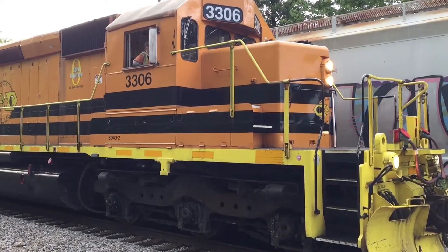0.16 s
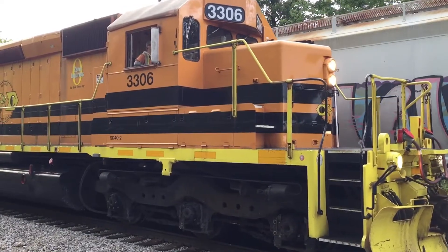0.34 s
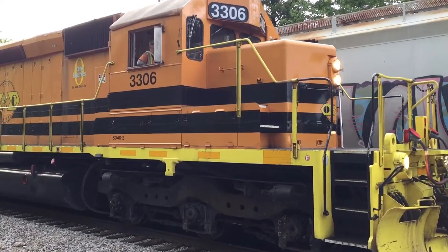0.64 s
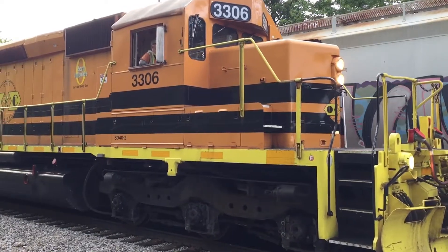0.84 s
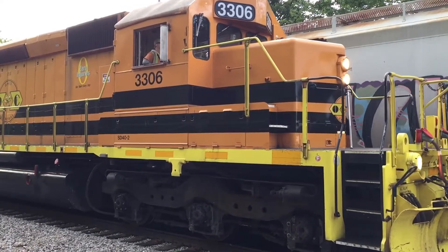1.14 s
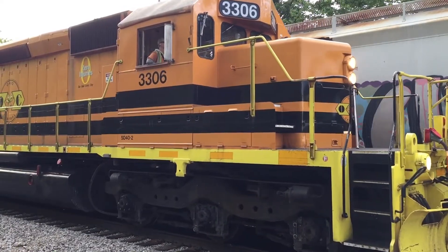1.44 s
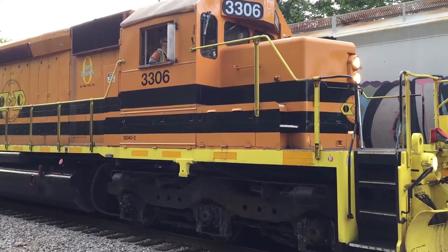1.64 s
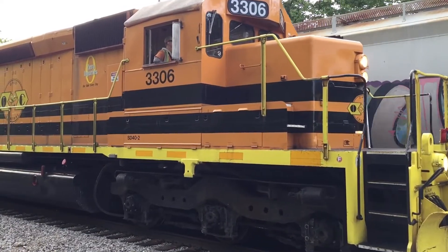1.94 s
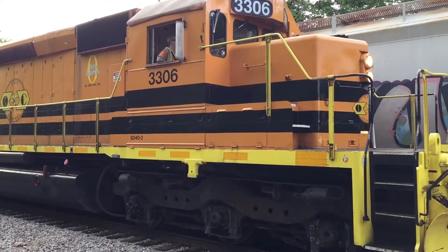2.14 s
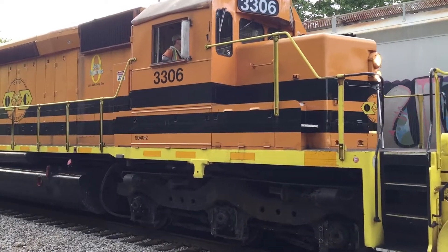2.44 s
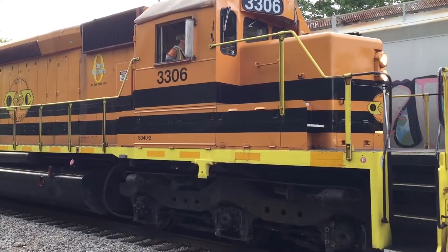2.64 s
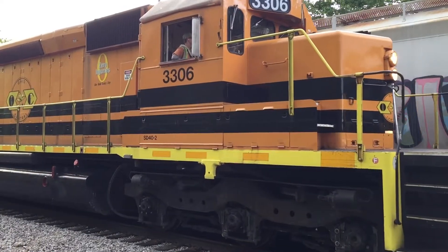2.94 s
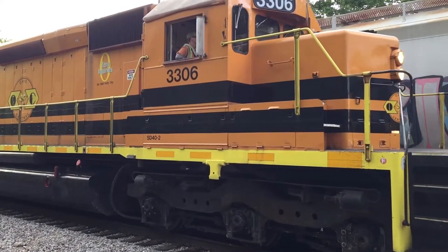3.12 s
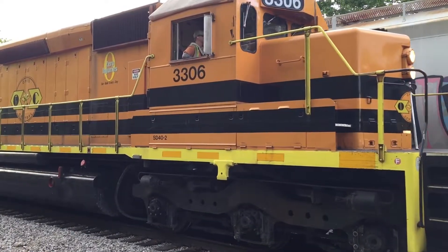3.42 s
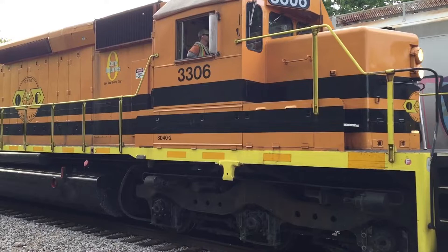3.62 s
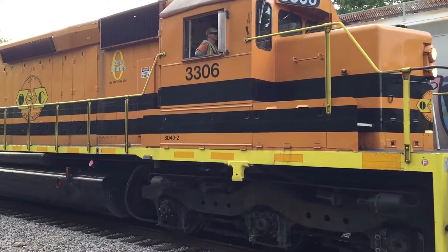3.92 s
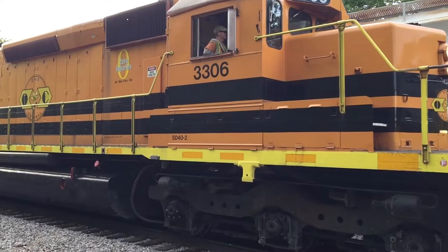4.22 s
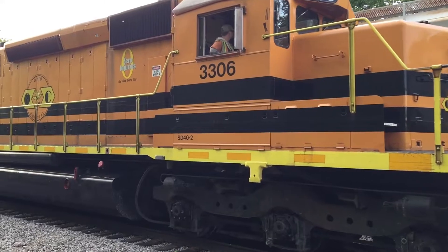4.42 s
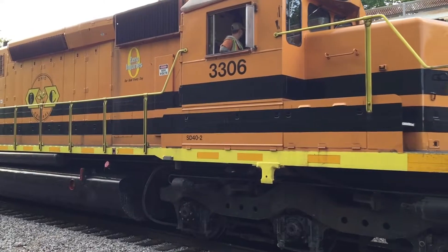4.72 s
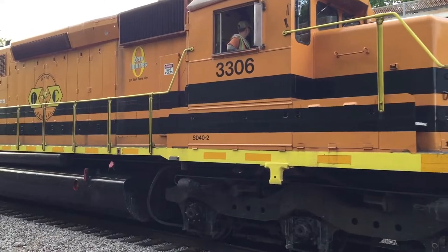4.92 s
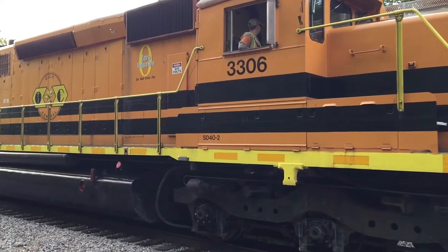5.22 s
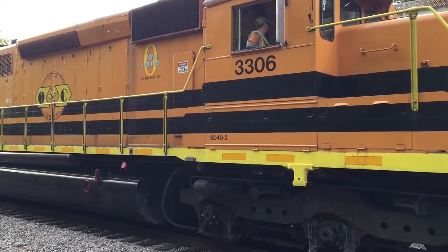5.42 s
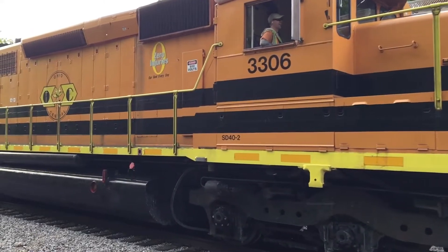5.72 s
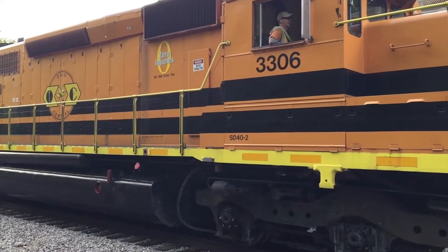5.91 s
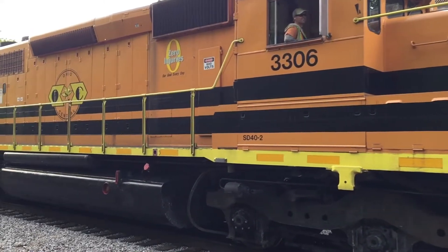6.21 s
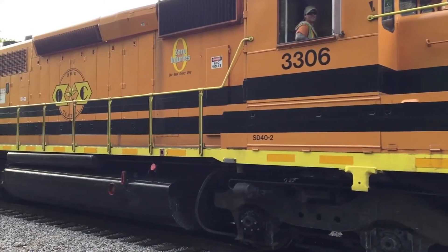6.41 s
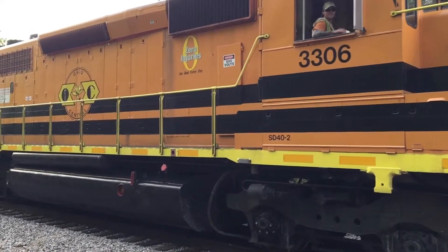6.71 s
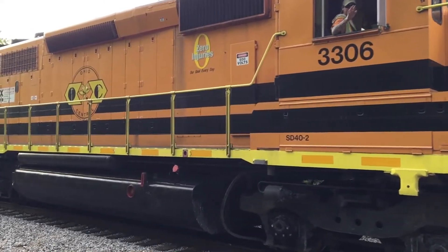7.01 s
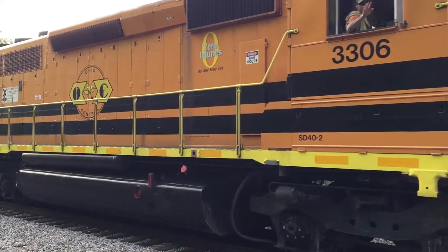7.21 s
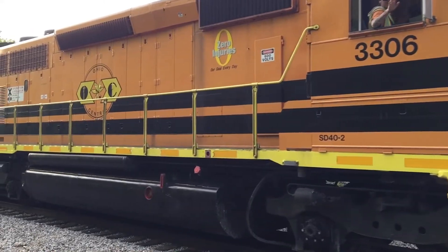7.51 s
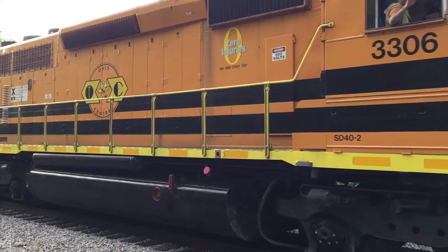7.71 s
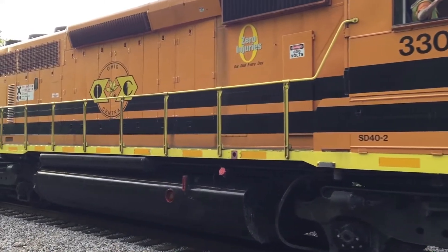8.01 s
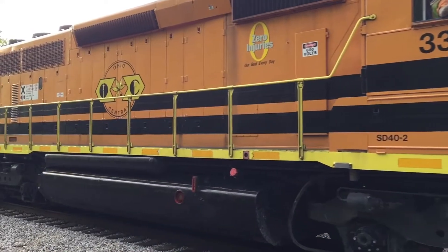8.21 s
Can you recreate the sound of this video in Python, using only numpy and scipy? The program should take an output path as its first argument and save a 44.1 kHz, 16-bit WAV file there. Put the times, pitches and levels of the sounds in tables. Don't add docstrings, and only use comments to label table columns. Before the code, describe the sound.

Close beside the track, several coupled diesel locomotives creep past. A heavy low exhaust throb rises in pitch over the first two seconds, then settles into a steady beating drone. Wavering gear whine and a faint high turbo whistle ride above casing and fan roar. Short air spits tick out every second or so, the later ones mostly sharper. One outdoor microphone by the gravel; no horn.

```python
import sys
import numpy as np
from scipy import signal
from scipy.io import wavfile

SR = 44100
rng = np.random.default_rng(int(sys.argv[2]) if len(sys.argv) > 2 else 0)


def persist_wave(psi):
    counts = np.round(np.clip(psi, -1, 1) * 32767).astype(np.int16)
    wavfile.write(sys.argv[1], SR, np.atleast_2d(counts).T)


def voltage_ratio(decibels):
    exponent = np.asarray(decibels, float) / 20
    return 10 ** exponent


N = 368229


def in_time(rows):
    s, *columns = np.transpose(rows)
    return [np.interp(np.arange(N) / SR, s, c) for c in columns]


def rms_one(x):
    return x / np.sqrt(np.mean(x ** 2) + 1e-20)


def drift(rate):
    pole = np.exp(-80 * np.pi * rate / SR)
    noise = rng.standard_normal(N // 40 + 2002)
    slow = signal.lfilter([1], [1, -2 * pole, pole * pole], noise)[2000:]
    return np.interp(np.arange(N) / 40, np.arange(len(slow)), rms_one(slow))


def band(x, low_hz, high_hz):
    return signal.sosfilt(signal.butter(2, [low_hz, high_hz], "band", fs=SR, output="sos"), x)


def tone(turns, db):
    return np.sqrt(2) * voltage_ratio(db) * np.cos(2 * np.pi * turns)


def cranks():
    # time in seconds, speed in turns per second.
    near_speed = [(0.0, 9.9038), (0.3, 10.0697), (0.6, 10.23), (0.9, 10.4154), (1.2, 10.5603),
                  (1.5, 10.6567), (1.8, 10.7087), (2.1, 10.7123), (2.5, 10.6677), (3.0, 10.6375),
                  (3.5, 10.6314), (4.0, 10.6337), (5.0, 10.6101), (6.0, 10.619), (7.0, 10.6192),
                  (8.35, 10.6113)]
    # time in seconds, speed in turns per second.
    far_speed = [(0.0, 10.3642), (0.3, 10.5128), (0.6, 10.72), (0.9, 10.8417), (1.2, 10.9468),
                 (1.5, 10.9851), (1.8, 11.0017), (2.1, 10.9808), (2.5, 10.9683), (3.0, 10.9658),
                 (3.5, 10.9562), (4.0, 10.9431), (5.0, 10.9371), (6.0, 10.939), (7.0, 10.965),
                 (8.35, 10.94)]
    near = np.cumsum(in_time(near_speed)[0]) / SR - .044
    far = np.cumsum(in_time(far_speed)[0]) / SR - .036
    third = 1.0145 * far + .05
    return near, far, third


def firing(near, far, third):
    # time in seconds, then rms levels in dB of the
    stacks = [(0, -19, -35, -25, -50), (.3, -18, -37, -28, -48), (.7, -22, -38, -34, -46),
              (1, -24, -34, -31, -45), (1.5, -23, -31, -27, -44), (2, -25, -31, -27, -36),
              (2.5, -25, -29, -30, -32), (3, -24, -29, -30, -34), (4, -24.5, -28.5, -29, -33),
              (5, -26.5, -28, -25.5, -33), (6, -29, -27, -26.5, -34), (7, -36, -27, -31, -33),
              (7.6, -33, -28, -26, -29), (8.35, -30, -29, -25, -30)]
    near_db, double_db, far_db, third_db = in_time(stacks)
    null_s, null_spread_s = 7, .3
    reversal = .45 / (1 + np.exp((null_s - np.arange(N) / SR) / null_spread_s))
    near_firing = tone(8 * near - reversal, near_db) + tone(16 * near, double_db)
    return near_firing + tone(8 * far, far_db) + tone(8 * third, third_db)


def exhaust(turns, orders, waver_db):
    t, out = np.arange(N) / SR, 0
    unloaded_db = -9 * np.exp(-t / 0.49)
    for k, db, db_per_s in orders:
        if k < 12:
            lag = .4 + .6 * (k - 9) + .03 * drift(.15)
        else:
            lag = .045 * (k - 15.5) ** 2
        level_db = db + db_per_s * (t - 4) + waver_db * drift(0.14)
        if k < 19:
            level_db = level_db + unloaded_db
        out = out + tone(k * turns + lag, level_db)
    return out


def exhausts(near, far, third):
    # multiple of crank speed, rms level in dB at 4 s, trend in dB per second.
    near_orders = [(4, -60, 0), (5, -43, 2), (6, -38, .7), (7, -33.5, -.2), (9, -32.5, 1.3), (10, -36.5, 0),
                   (11, -31.5, .2), (12, -44, 0), (13, -45, -1), (14, -40, 1.4), (15, -39, 1),
                   (17, -33.5, -.8), (18, -39, .3), (19, -50, 0), (21, -47, 0), (22, -45, 0), (23, -50, 0),
                   (24, -54, 0), (25, -49, 0), (26, -54, 0), (30, -54, 0), (36, -53, 0), (37, -56, 0),
                   (40, -53, 0), (43, -54, 0), (44, -53, 0), (49, -53, 0), (54, -54, 0), (70, -54, 0)]
    # multiple of crank speed, rms level in dB at 4 s, trend in dB per second.
    far_orders = [(6, -47, 0), (9, -39, 1.4), (10, -41, 0), (11, -47, 0), (16, -48, -1)]
    # multiple of crank speed, rms level in dB at 4 s, trend in dB per second.
    third_orders = [(6, -48, 0), (9, -46, 0)]
    out = exhaust(near, near_orders, 1.2)
    return out + exhaust(far, far_orders, 1.5) + exhaust(third, third_orders, 1.5)


def passing(line, more=()):
    (db, db_per_s), spots = line
    t = np.arange(0, N + 64, 64) / SR
    level_db = db + db_per_s * (t - 4)
    for s, half_width_s, gain_db in [*spots, *more]:
        level_db = level_db + gain_db * np.exp(-((t - s) / half_width_s) ** 2)
    return np.interp(np.arange(N) / SR, t, level_db)


def flutter(turns, db, scatter, rate):
    direct = (1 + scatter * drift(rate)) * tone(turns, db)
    scattered = scatter * drift(rate) * tone(turns + 1 / 4, db)
    return (direct + scattered) / np.sqrt(1 + 2 * scatter ** 2)


def machinery(near, far, third):
    # time in seconds, half width in seconds, gain in dB.
    mesh_1 = (-42.5, 0.78), [(.4, .12, -12), (.8, 0.26, -15), (1.39, 0.12, 7), (1.99, 0.086, -8),
              (2.39, 0.11, -14), (3.18, 0.1, -8), (3.58, .12, -15.5), (5.17, 0.1, -16), (5.57, 0.15, -12),
              (6.2, 0.62, -3), (7.4, 0.46, 3)]
    mesh_2 = (-39.5, 0.11), [(7.38, 0.32, 6), (4.48, 0.099, 4), (1.5, 0.16, -2.5), (2.8, 0.53, -6),
              (5.33, 0.4, -7)]
    mesh_3 = (-54, 0.81), [(1.25, .2, 4), (1.6, 0.15, -11), (2.19, .12, -9), (3.4, 0.26, -6),
              (4.37, 0.11, -11), (4.77, 0.16, -9), (5.35, 0.17, 6.5), (5.77, 0.17, 6.5), (6.3, 0.25, 6),
              (7.0, 0.29, 6.5), (7.65, 0.18, -5)]
    mesh_4 = (-52.5, 0.46), [(.5, 0.44, -7), (1.52, 0.27, -13), (2.39, 0.14, -11), (3.2, 0.46, -4),
              (5.37, 0.2, -10), (6.55, .25, -7), (7.36, .12, -6)]
    far_mesh = (-51, .1), [(.67, 0.27, -9), (1.85, 0.36, 7.5), (3.2, .4, -1), (6.5, .3, -8)]
    # time in seconds, half width in seconds, gain in dB.
    clutch = (-51, .1), [(.2, .35, -17), (2.0, .2, -18), (4.68, .2, -11), (6.1, 0.28, 4), (7.4, 0.54, -6)]
    pump = (-45.5, .1), [(.6, .9, -4), (2.9, 0.47, 10.5), (3.8, 0.56, 6.5), (5.15, 0.32, 8), (6.35, .2, -4),
            (7.35, 0.16, -10), (8.2, 0.35, -16)]
    idler = (-44, 0.12), [(.5, .6, -8.5), (2.1, .5, -21), (3.34, 0.079, 6.5), (5.0, 0.12, -6),
             (6.68, 0.23, 2), (8.2, .3, -7)]
    blower = (-66, .1), [(1.67, .2, 6), (3.85, 0.36, 16), (4.68, .2, 9), (6.55, 0.32, 25),
              (7.3, 0.34, 28.4), (8.2, .3, 15)]
    # time in seconds, half width in seconds, gain in dB.
    nulls = [(.09, 0.025, -16.5), (.61, 0.042, -6.5), (.7, 0.027, -9), (.83, 0.025, -9), (1.0, 0.044, -10),
             (1.14, 0.044, -23), (1.53, .04, -10), (1.64, .04, -11), (1.87, 0.1, -8), (2.58, .04, -13),
             (2.87, 0.048, -12), (3.05, 0.049, -10), (3.43, .06, -18), (3.63, 0.052, -20),
             (3.84, 0.071, -9), (4.35, .04, -16), (4.59, 0.053, -19), (4.88, 0.074, -13), (5.34, .07, -7),
             (5.59, 0.038, -1), (5.88, .06, -5), (6.03, 0.019, -11), (6.15, 0.039, -13), (6.28, 0.16, -9),
             (6.73, 0.15, -5), (6.99, 0.053, -8), (8.09, 0.072, -15), (8.23, 0.024, -15),
             (8.35, 0.081, -19.5)]
    # multiple of crank speed, rms level in dB at 4 s, trend in dB per second.
    faint_shafts = [(31.75, -47, 0), (47.6, -49, 0), (63.5, -48.5, .5), (113, -50, 0), (158, -54, 0),
                    (554.5, -64, .7), (564.5, -65, .8), (721.4, -69, 1)]

    teeth = 144.25
    out = flutter(2 * teeth * near, passing(mesh_2, nulls), 0.24, 28)
    for k, line in ((1, mesh_1), (3, mesh_3), (4, mesh_4)):
        out += flutter(teeth * k * near, passing(line), .2 + .1 * k, 7 * k)
    out += flutter(2 * teeth * far, passing(far_mesh), .9, 16)
    out += flutter(2 * teeth * third, -61, .7, 8)
    geared = ((282.2, clutch, .8, 14), (79, pump, .35, 9), (100.8, idler, .25, 8), (95.1, blower, .3, 6))
    for contacts, line, scatter, rate in geared:
        out += flutter(contacts * near, passing(line), scatter, rate)
    since = np.arange(N) / SR - 4
    for k, db, db_per_s in faint_shafts:
        out += flutter(k * near, db + db_per_s * since, .6, 4)
    return out


def turbo(far, core_hz=130, skirt_hz=480):
    spool_mid_s, spool_s = 1.47, 0.13
    db = -45 - 5.5 / (1 + np.exp((np.arange(N) / SR - spool_mid_s) / spool_s))
    angle = 2 * np.pi * 817.3 * far
    wobble = rng.standard_normal((2, N))
    wobble = signal.sosfilt(signal.butter(1, core_hz, fs=SR, output="sos"), wobble)
    wobble = signal.sosfilt(signal.butter(2, skirt_hz, fs=SR, output="sos"), wobble)
    return voltage_ratio(db) * rms_one(wobble[0] * np.cos(angle) + wobble[1] * np.sin(angle))


def drain_valve(open_s=.002, echo_s=.010, echo_db=-14, tail_db=-13, tail_t60=.3):
    # start in seconds, peak level in dB, low jet level in dB, low jet centre in Hz,
    # blow-off time to -60 dB in seconds.
    spits = [
        (0.926, -29, -3, 6000, 0.022),
        (2.2943, -28.5, 4, 5700, 0.022),
        (3.873, -26.5, 3.5, 6200, 0.018),
        (4.994, -25, 2, 5680, 0.017),
        (6.252, -25, 2, 4660, 0.018),
        (6.9165, -33, 4, 4700, 0.019),
        (7.5649, -21.5, 0, 5600, 0.032),
        (8.2126, -23.5, 0, 4370, 0.024),
    ]
    t, out = np.arange(round(.4 * SR)) / SR, np.zeros(N + SR)
    for s, db, low_db, low_hz, t60 in spits:
        noise = rng.standard_normal((3, len(t)))
        jet = rms_one(band(noise[0], 8900, 14600)) + rms_one(band(noise[2], 3000, 9600))
        jet += voltage_ratio(low_db) * rms_one(band(noise[1], 0.91 * low_hz, 1.106 * low_hz))
        blow = voltage_ratio(-60 * np.maximum(t - open_s, 0) / t60)
        blow += voltage_ratio(echo_db) * np.interp(t - echo_s, t, blow, left=0)
        tail = voltage_ratio(tail_db - 60 * t / tail_t60)
        shape = np.minimum(t / open_s, 1) * (blow + tail)
        at = round(s * SR)
        out[at:at + len(t)] += voltage_ratio(db - 7.0) * jet * shape
    return out[:N]


def coloured(spectrum, patchy_db):
    hz, db = np.transpose(spectrum)
    edges = np.geomspace(hz[0], hz[-1], round(4 * np.log2(hz[-1] / hz[0])))
    white, together, out = rng.standard_normal((2, N)), drift(10), 0
    for k, (low, high) in enumerate(zip(edges, edges[1:])):
        level_db = np.interp(np.log(low * high) / 2, np.log(hz), db)
        flicker_db = patchy_db * (0.12 * together + drift(10.7))
        out = out + voltage_ratio(level_db + flicker_db) * band(white[k % 2], low, high)
    return out


def air():
    # frequency in Hz, level in dB per Hz.
    roar_colour = [(28, -30), (45, -18), (60, -7), (110, -11), (200, -7), (280, -8), (430, -12), (700, -10),
                   (1500, -15), (2000, -22), (3500, -28), (5000, -36)]
    # frequency in Hz, level in dB per Hz.
    hiss_colour = [(2500, -16.5), (4500, 1.5), (5000, 3), (6050, 2), (6600, -4.5), (7600, -4.5), (9500, -4),
                   (11500, -13), (16500, -13)]
    # time in seconds, gain in dB.
    load = [(0.0, -3.5), (0.11, -0.5), (0.3, -3.5), (0.56, -4), (1.0, -2.5), (2.5, 0.5), (3.4, 1.1),
            (4.5, 0.9), (6.1, 0.7), (6.42, 2), (6.6, 1.5), (7.5, 3), (7.88, 2), (8.35, 2.5)]
    load_db, = in_time(load)
    roar, hiss = coloured(roar_colour, patchy_db=1.22), coloured(hiss_colour, patchy_db=0.94)
    roar /= np.std(band(roar, 250, 2600))
    hiss /= np.std(band(hiss, 10800, 15500))
    return voltage_ratio(-33 + load_db) * roar + voltage_ratio(-60.5 + 1.48 * load_db) * hiss


def scene():
    # centre in Hz, width in Hz, depth in dB.
    notches = [
        (4950, 450, -6),
        (10400, 800, -9),
    ]
    near, far, third = cranks()
    out = firing(near, far, third) + exhausts(near, far, third) + machinery(near, far, third)
    out = out + turbo(far) + drain_valve() + air()
    for hz, width_hz, depth_db in notches:
        dip = signal.lfilter(*signal.iirpeak(hz, hz / width_hz, fs=SR), out)
        out = out - (1 - voltage_ratio(depth_db)) * dip
    return out[None]


def top_cut(x):
    return signal.sosfilt(signal.butter(12, 16490, fs=SR, output="sos"), x)


def record(dry):
    mix = signal.sosfilt(signal.ellip(10, .3, 36, 15800, fs=SR, output="sos"), dry)
    return top_cut(mix)


dry = scene()
out = record(dry)
persist_wave(out)
```